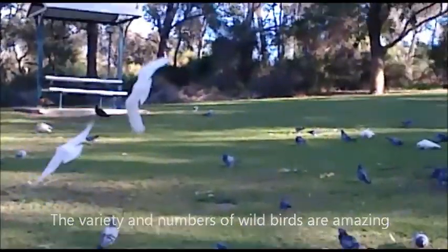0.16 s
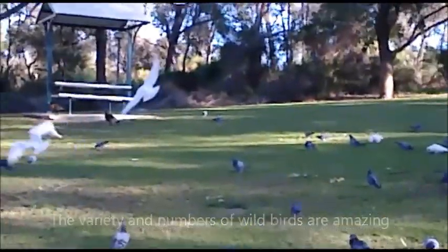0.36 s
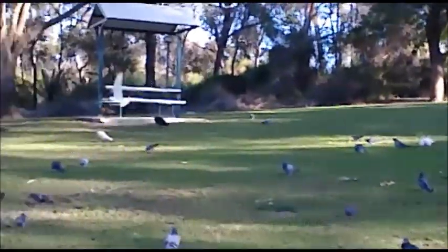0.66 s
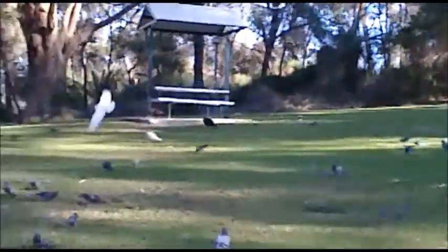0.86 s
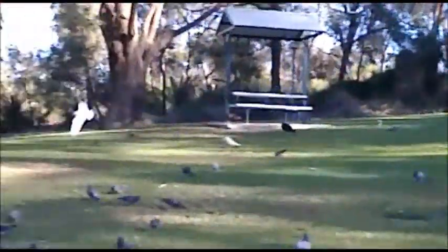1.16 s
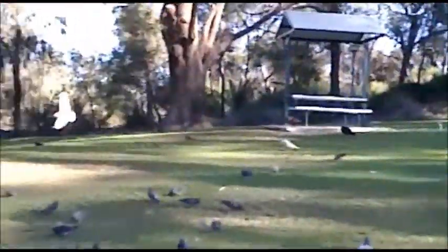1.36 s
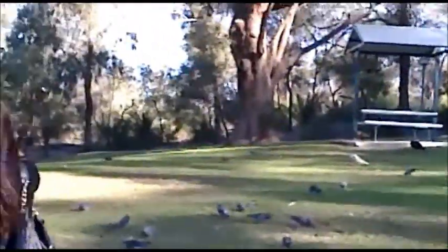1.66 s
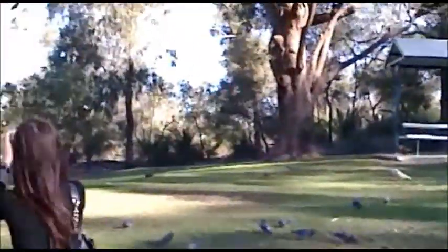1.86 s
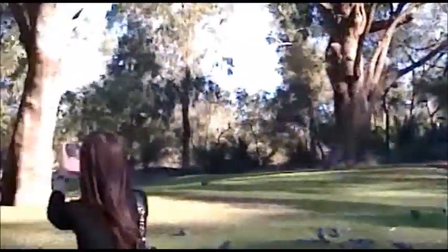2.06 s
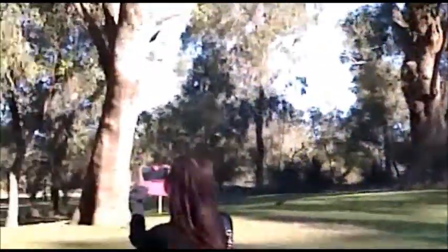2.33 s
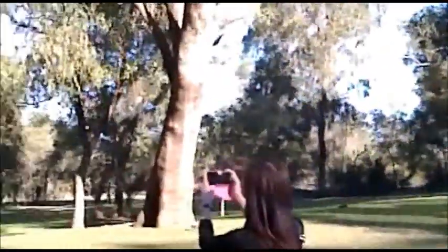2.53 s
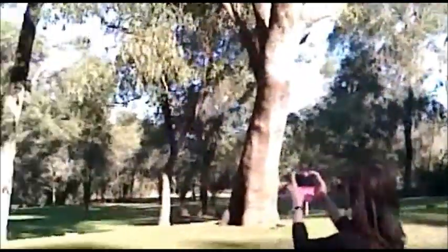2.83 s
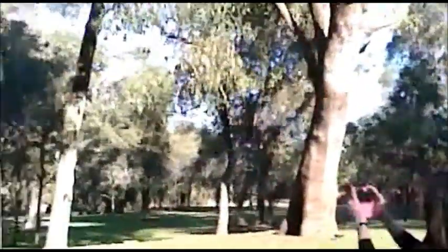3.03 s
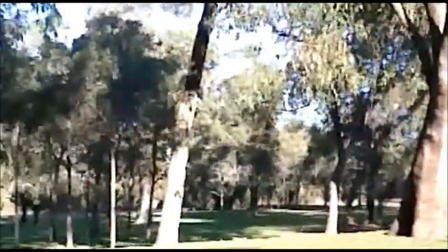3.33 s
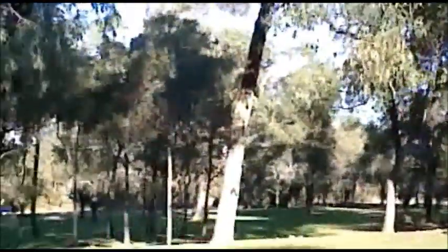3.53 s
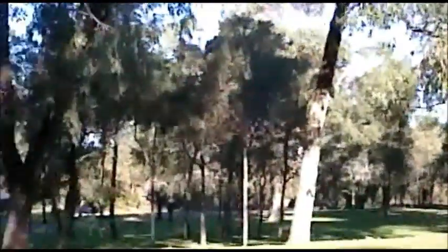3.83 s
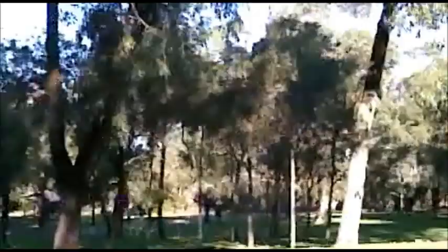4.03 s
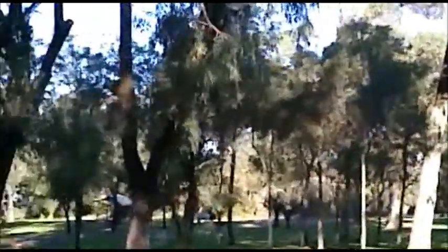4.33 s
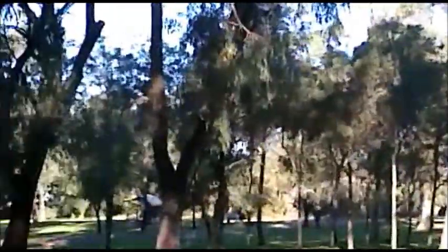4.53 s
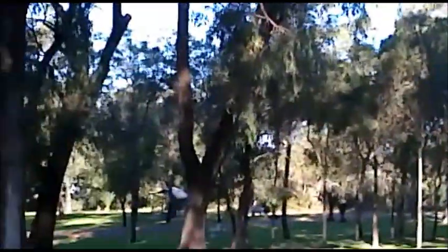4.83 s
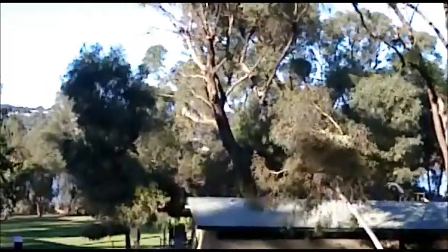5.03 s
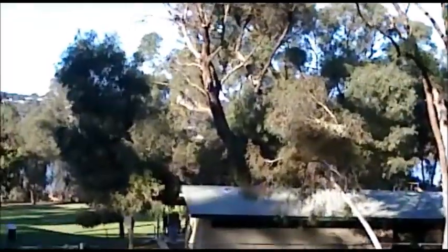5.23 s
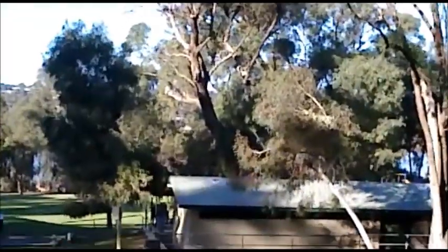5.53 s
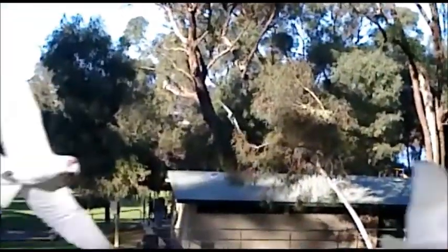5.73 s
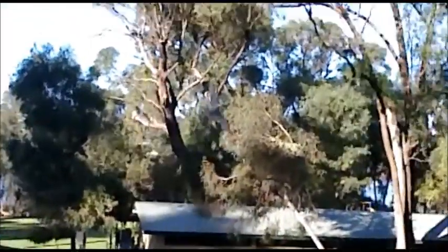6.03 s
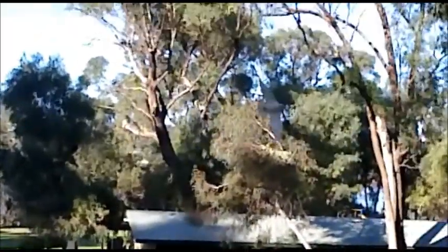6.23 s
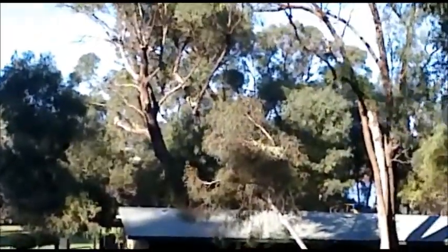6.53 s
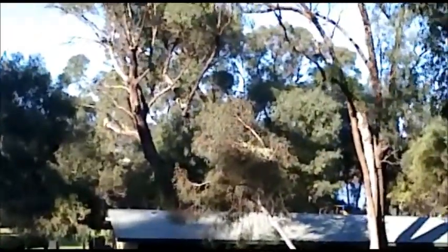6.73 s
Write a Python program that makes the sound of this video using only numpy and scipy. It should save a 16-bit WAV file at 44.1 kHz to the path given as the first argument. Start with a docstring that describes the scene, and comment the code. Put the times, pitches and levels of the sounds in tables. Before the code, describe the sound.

Many brief, raspy parrot squawks with a thin tree echo, faint pigeon coos and buffeting wind rumble, interrupted by one tiny dropout.

```python
"""Cockatoos squawk and screech over a park lawn. A buzzing, rattling voice warbles over two crests of pitch,
often with a short catch after them, and breaks up towards its end; two long screeches cross each other, and the
loudest plunges and climbs back. Far screeches are bands of noise, pigeons coo in husky near-sines, and the trees
return a thin echo of the cockatoos. Noise and pressure pulses make wind rumble and thump on the microphone, over a
park hush, a faint whine and a brief hiss. The sound cuts out briefly near five seconds."""
import sys
import numpy as np
from scipy import signal
from scipy.fft import rfft, irfft, next_fast_len
from scipy.io import wavfile
from scipy.ndimage import uniform_filter1d, map_coordinates

SR = 44100
rng = np.random.default_rng(int(sys.argv[2]) if len(sys.argv) > 2 else 0)


def transcribe(signal):
    """Save signal, clipped to [-1, 1], as a 16-bit WAV file at the path in sys.argv[1]."""
    frames = np.atleast_2d(signal).T
    limited = np.clip(frames, -1, 1)
    pcm = np.round(limited * 32767).astype(np.int16)
    wavfile.write(sys.argv[1], SR, pcm)


N = 303849
TURN = 2 * np.pi  # one cycle in radians


def undb(db):
    """Decibels to gain."""
    return 10 ** (np.asarray(db) / 20)


def unit(x):
    """Scale to rms 1."""
    return x / np.sqrt(np.mean(x ** 2) + 1e-18)


def times(start_s, end_s):
    """Sample times of a stretch, in seconds."""
    return np.arange(int(start_s * SR), int(end_s * SR)) / SR


def add(out, start_s, x):
    """Mix x into out from a given time."""
    i = max(int(start_s * SR), 0)
    out[i:i + len(x)] += x[:max(len(out) - i, 0)]


def shape(x, gain):
    """Filter x by a gain that is a function of frequency."""
    size = next_fast_len(len(x) + 2048)
    # 1 Hz is added so that no frequency is zero
    hz = np.arange(size // 2 + 1) * SR / size + 1
    return irfft(rfft(x, size) * gain(hz), size)[:len(x)]


def colour(points):
    """Gain function through (Hz, dB) points, interpolated along log frequency."""
    hz, db = np.transpose(points)
    return lambda f: undb(np.interp(np.log(f), np.log(hz), db))


def resonance(f, hz, width_hz):
    """A steep-sided resonance, gain 1 at its centre."""
    return 1 / (1 + ((f * f - hz * hz) / (f * width_hz * np.sqrt(2))) ** 2)


def noise(size, gain):
    """Coloured noise of rms 1."""
    return unit(shape(rng.standard_normal(size), gain))


def wobble(size, hz):
    """Random motion of rms 1, mostly slower than a given rate."""
    return noise(size, lambda f: 1 / (1 + (f / hz) ** 4))


def park_hush(level_db=-60.5):
    """The open park's steady hush is noise that thins towards the treble."""
    # spectrum of the hush: frequency_hz, relative_db
    hush_colour = [(120, -58), (400, -65), (4000, -80), (8000, -80.5), (14000, -92.5)]
    return noise(N, colour(hush_colour)) * undb(level_db)


def wind(trim_db=-2, gust_db=3.3, flurry_db=-10, flurry_s=0.022):
    """Eddies rumble on the microphone; the sharpest are a push of pressure inside a flurry."""
    # course of the wind: time_s, level_db (before the trim and the gusts)
    wind_course = [(0, -27.5), (.66, -21.5), (.8, -39.5), (1.58, -38.5), (1.72, -48), (1.85, -35),
                   (2.9, -26.5), (3.4, -32), (3.75, -23.5), (4.149, -40), (4.879, -29.5), (5.3, -51),
                   (6.05, -40.5), (6.55, -48.5), (6.75, -32), (6.89, -53.5)]
    # spectrum of the rumble: frequency_hz, relative_db
    wind_colour = [(15, -2), (35, 6), (80, 1), (250, -22), (3000, -79.5)]
    # sharp buffets: time_s, push_peak_db, push_length_s
    buffets = [(0.599, -8.5, 0.0026), (0.65, -12, 0.0015), (2.057, -5, 0.0041), (2.139, -9.5, 0.0017),
               (2.861, -4, 0.0026), (3.033, -15.5, 0.0016)]
    s, db = np.transpose(wind_course)
    level_db = np.interp(np.arange(N) / SR, s, db) + trim_db
    gusts_db = gust_db * wobble(N, hz=13.8)
    out = noise(N, colour(wind_colour)) * undb(level_db + gusts_db)

    t = times(-.1, .1)
    for at, peak_db, length in buffets:
        u = t / length
        # pressure rises at the centre and dips on either side
        push = (1 - u ** 2) / (1 + u ** 2) ** 2
        flurry = undb(flurry_db) * noise(len(t), colour(wind_colour))
        envelope = np.exp(-(t / flurry_s) ** 2)
        add(out, at + t[0], undb(peak_db) * (push + flurry) * envelope)
    return out


def whine(first_hz=397, last_hz=426, level_db=-75):
    """A faint, thin whine of a few high harmonics creeps up in pitch in the lull between calls."""
    out, t = np.zeros(N), times(1.9, 2.92)
    # the fundamental itself is absent
    phase = TURN * np.cumsum(np.linspace(first_hz, last_hz, len(t))) / SR
    tone = sum(np.sin(k * phase) / np.sqrt(k) * wobble(len(t), hz=3) for k in (5, 6, 10, 14))
    add(out, t.min(), unit(tone) * signal.windows.tukey(len(t)) * undb(level_db))
    return out


def hiss(start_s=5.1, end_s=5.29, level_db=-52):
    """A thin, bright hiss of noise swells and stops."""
    out, t = np.zeros(N), times(start_s, end_s)
    air = noise(len(t), lambda f: resonance(f, hz=11000, width_hz=10000))
    swell = np.linspace(0, 1, len(t)) ** 2 * signal.windows.tukey(len(t), .2)
    add(out, start_s, air * swell * undb(level_db))
    return out


def far_screech(start_s, end_s, hz, width_hz, level_db):
    """A distant screech, smeared by the trees into a rough band."""
    out, t = np.zeros(N), times(start_s, end_s)
    band = noise(len(t), lambda f: resonance(f, hz, width_hz) ** 2)
    add(out, start_s, band * signal.windows.tukey(len(t), .3) * undb(level_db))
    return out


def far_cockatoos():
    """All the distant screeches."""
    # start_s, end_s, centre_hz, width_hz (of the resonance before squaring), level_db
    far_calls = [(0, 0.21, 3560, 660, -50), (0.273, 0.321, 2060, 590, -48), (4.297, 4.865, 1570, 1380, -53)]
    return sum(far_screech(*row) for row in far_calls)


def coo_tone(hz, overtone_db):
    """A pigeon's voice: nearly a sine, muffled by its swollen crop."""
    phase = TURN * np.cumsum(hz) / SR
    return unit(np.sin(phase) + undb(overtone_db) * np.sin(2 * phase))


def pigeons(throb_hz=20.38, pitch_hz=350, lift_hz=35, last_hz=308, pause_s=0.1, moan_s=0.152, moan_db=-6.0):
    """Each coo is a swelling run of husky throbs, then a smooth falling moan."""
    # throbbing first half of each coo: start_s, end_s, level_db (before throb and swell)
    coos = [(1.043, 1.304, -42), (2.332, 2.565, -37), (3.437, 3.719, -37), (4.59, 4.811, -34.5)]
    out = np.zeros(N)
    for start, end, db in coos:
        t = times(start, end) - start
        throb = np.maximum(np.sin(TURN * throb_hz * t), 0)
        swell = undb(-7 * (2 * t / t[-1] - 1) ** 2) * signal.windows.tukey(len(t), .1)
        husk = noise(len(t), lambda f: resonance(f, hz=367, width_hz=122))
        # pitch lifts with every throb
        tone = coo_tone(pitch_hz + lift_hz * throb, overtone_db=-18.0)
        add(out, start, (tone + husk) * throb ** 2 * swell * undb(db))

        size = len(times(0, moan_s))
        hz = last_hz + (pitch_hz - last_hz) * np.linspace(1, 0, size) ** 2
        moan = coo_tone(hz, overtone_db=-14.5) * signal.windows.hann(size)
        add(out, end + pause_s, moan * undb(db + moan_db))
    return out


def trees(x, t60_s=0.38, wet_db=-22, build_up_s=0.007):
    """Trunks and crowns scatter a dull echo that builds up, then dies away."""
    t = times(0, 2)
    tail = noise(len(t), lambda f: resonance(f, hz=1530, width_hz=2850))
    tail = tail * undb(-60 * t / t60_s) * np.minimum(t / build_up_s, 1)
    return undb(wet_db) * signal.fftconvolve(x, tail / np.linalg.norm(tail))[:N]


def warble(start, beat, catch, first_hz, second_hz, dip, first_db, second_db, rough):
    """Turning points (s, pitch Hz, level dB, roughness) of a squawk: scoop, crest, dip, crest, perhaps a catch, fall."""
    # scoop into the first crest and fall from the last point: s, share of that point's pitch, dB against it
    attack_s, attack_pitch, attack_db = .019, .89, -14.5
    release_s, release_pitch, release_db = 0.016, 0.77, -19
    # the catch sinks and rebounds: shares of the second crest's pitch, dB of the rebound against it
    catch_dip, catch_pitch, catch_db = .8, .91, -3.5
    effort_db_per_octave = 20  # the voice weakens as its pitch dips
    # a squawk starts clean and ends broken
    clean, broken = rough * .45, rough * 2.1

    low_hz = min(first_hz, second_hz) * (1 - dip)
    # pitch falls and climbs at the same speed, so the dip lies nearer the lower crest
    share = (first_hz - low_hz) / (first_hz + second_hz - 2 * low_hz)
    low_db = first_db + share * (second_db - first_db) + effort_db_per_octave * np.log2(1 - dip)
    second = start + beat
    points = [(start - attack_s, first_hz * attack_pitch, first_db + attack_db, clean),
              (start, first_hz, first_db, clean),
              (start + share * beat, low_hz, low_db, rough),
              (second, second_hz, second_db, rough)]
    if catch > 0:
        sunk_db = second_db + effort_db_per_octave * np.log2(catch_dip)
        points += [(second + catch / 2, second_hz * catch_dip, sunk_db, broken),
                   (second + catch, second_hz * catch_pitch, second_db + catch_db, broken)]
    last, last_hz, last_db, _ = points[-1]
    return points + [(last + release_s, last_hz * release_pitch, last_db + release_db, broken)]


def squawk(throat_hz, beak_hz, beak_db, upper_db, rows):
    """The syrinx buzzes, rattles and rasps; throat and beak colour it and move a little with the pitch."""
    # what the throat lets through between its resonances: frequency_hz, gain_db (before the beak's muffling)
    throat_floor = [(550, -11.5), (950, -19), (2200, -7), (2900, -18.5), (4300, -23), (6400, -20),
                    (10500, -51.5)]
    follow = 0.13  # octaves that the resonances move for each octave of pitch
    rattle_cycles = 3
    rattle_depth = .6  # radians, for the fundamental at full roughness
    rasp_db = -6  # rasping air against the buzz at full roughness
    fade_s = .005

    s, pitch, db, rough = np.transpose(rows)
    s = np.sort(s)
    t = times(s[0] - fade_s, s[-1] + fade_s)
    size = len(t)
    # pitch swings in rounded arches through its turning points
    place = np.interp(t, s, np.arange(len(s)))
    hz = map_coordinates(pitch, [place], order=3, mode="nearest")
    chaos = np.clip(np.interp(t, s, rough) * undb(2 * wobble(size, hz=25)), 0, 1)

    def tract(f):
        """Throat and beak resonances; a half-shut beak muffles the sound, more towards the treble."""
        upper = undb(upper_db) * resonance(f, hz=4926, width_hz=450)
        beak = resonance(f, beak_hz, width_hz=410) + upper
        throat = colour(throat_floor)(f) + resonance(f, throat_hz, width_hz=363)
        muffle = (1 + (f / throat_hz) ** 2) ** (min(beak_db, 0) / 45)
        return (throat + undb(beak_db) * beak) * muffle

    jitter = 0.023 * chaos * wobble(size, hz=355)
    phase = TURN * np.cumsum(hz * (1 + jitter)) / SR
    shift = (hz / hz.mean()) ** follow
    # a strained syrinx repeats only every few cycles: side bands beside the harmonics, the high ones most
    rattle = phase / rattle_cycles
    buzz = np.zeros(size)
    for k in range(1, 19):
        split = rattle_depth * chaos * np.sqrt(k) * np.sin(rattle + TURN * rng.random())
        harmonic = np.cos(k * phase + split + TURN * rng.random())
        # as the bird turns in flight, each harmonic swells and fades by itself
        buzz += tract(k * hz / shift) * harmonic * undb(4.3 * wobble(size, hz=27))
    # the air pulses once a cycle
    rasp = shape(rng.standard_normal(size) * (1 + np.cos(phase)), tract)
    voice = unit(buzz) + undb(rasp_db) * chaos * unit(rasp)
    # even out the loudness, so that the level curve alone sets it
    voice = voice / np.sqrt(uniform_filter1d(voice ** 2, size=700) + 1e-12)
    edges = signal.windows.tukey(size, 2 * fade_s * SR / size)
    out = np.zeros(N)
    add(out, t[0], voice * edges * undb(np.interp(t, s, db)))
    return out


def cockatoos():
    """All the near calls: short squawks on a warbling gesture, and screeches on free curves."""
    # one squawk each: first_crest_s, time_to_second_crest_s, time_on_to_catch_s (0 for none), first_pitch_hz,
    # second_pitch_hz, dip_below_lower_crest (share), first_level_db, second_level_db, throat_resonance_hz,
    # beak_resonance_hz, beak_db, upper_resonance_db (against the beak), roughness (share, mid-squawk)
    squawks = [ (0.127, 0.046, 0.045, 596, 595, 0.06, -43, -44.5, 1070, 3250, -3.5, -6, 0.4),
               (0.242, 0.025, 0.0028, 616.6, 507, 0, -24, -36, 1120, 3570, -21, 8.5, 0.1),
               (0.792, 0.049, 0.013, 824, 887, 0.05, -33.5, -34.5, 1990, 3590, -5.5, -7, 0.6),
               (1.258, 0.052, 0.019, 674, 679, 0.12, -32.5, -34, 3200, 3540, -19, -14, 0.4),
               (1.346, 0.046, 0.043, 869, 1030, .12, -36, -32, 1830, 3420, -6, -4, 0.29),
               (1.592, 0.06, 0.026, 762, 817, 0.16, -38.5, -34, 5300, 3640, 0.5, -1, 0.17),
               (1.812, 0.041, 0.057, 646, 705, 0.06, -30, -30.5, 3270, 4040, -6.5, 6, 0.15),
               (2.946, 0.054, 0, 785, 813, 0.03, -41, -40, 1430, 3900, -8.5, -13, 0.18),
               (3.002, 0.056, 0.068, 662, 739, 0.07, -43, -31, 1420, 3470, -2, -13, 0.2),
               (3.138, 0.037, 0, 668, 474, 0.1, -41.5, -44.5, 1500, 2050, -14, -10, 0.24),
               (3.244, 0.022, 0.051, 638, 690, 0, -42.5, -42.5, 1230, 3320, -31, -20, 0.3),
               (3.539, 0.048, 0.0045, 811, 865, 0.08, -40, -34, 1580, 3570, -5.5, -14.5, 0.15),
               (3.972, 0.04, 0, 616, 643, 0.1, -39.5, -38, 1230, 3340, -9, -8, 0.21),
               (4.026, 0.038, 0, 635, 500, 0.05, -35, -53.5, 1830, 3330, -43, -11, 0.1),
               (4.229, 0.063, 0.036, 781.5, 860, 0.09, -43, -29.5, 1650, 3690, -1, -14, 0.28),
               (4.362, 0.024, 0.027, 739, 680, 0.03, -45.5, -48, 1400, 3740, -0.5, -14.5, 0.6),
               (4.672, 0.097, 0.0083, 658, 648, .12, -43.5, -41.5, 1900, 3450, -0.5, -5, 0.9),
               (5.168, 0.066, 0.033, 806, 868, 0.2, -45, -34.5, 1570, 3660, -5, -16, 0.1),
               (5.368, 0.051, 0.0012, 705, 578, 0.16, -29.5, -30, 1110, 3720, -2.5, -20, 0.4),
               (5.904, 0.056, 0.046, 628, 705.5, 0.02, -37, -32.5, 1300, 3260, -4, -6, 0.24),
               (6.158, 0.061, 0.039, 803, 868, 0.19, -40.5, -36, 1610, 3560, -17.5, 0, 0.26),
               (6.321, 0.049, 0.032, 631, 531, 0.14, -50.5, -51, 1190, 3380, -10.5, -5, 0.56),
               (6.515, 0.064, 0, 681, 703, 0.16, -52, -58.5, 1100, 3600, -3, -18, 0.2), ]
    # a climb that cracks and holds, a second bird sagging across it, the loudest plunge and climb, a hard rasp:
    # throat_resonance_hz, beak_resonance_hz, beak_db, upper_resonance_db (against the beak),
    # curve of (time_s, pitch_hz, level_db, roughness as a share)
    screeches = [ (2540, 2970, -6.5, -6.5, [(.855, 712.5, -50, .12), (.897, 720, -31.5, 0.22),
                 (.96, 766.6, -30, 0.28), (.986, 814.4, -23, 0.07), (1.012, 704, -33, 0.63),
                 (1.055, 756, -30, .25), (1.085, 701.5, -33.5, 0.28), (1.15, 692, -32.5, 0.2),
                 (1.18, 683, -39, 0.5)]), (2020, 3050, -2, -4.5, [(.99, 720, -33.5, .6),
                 (1.067, 640, -37, 0.3), (1.115, 655.4, -29.5, 0.22), (1.225, 632.6, -37, 0.23),
                 (1.28, 563, -43, 0.6)]), (2900, 3730, 0.5, -1, [(4.528, 816, -46, .1),
                 (4.546, 947, -25, 0.3), (4.58, 776, -25.5, 0.02), (4.595, 639, -35.5, 0.88),
                 (4.615, 900, -28, 0.25), (4.631, 939, -29.5, 0.2), (4.644, 750, -37.5, 0.4)]),
                 (2020, 3800, -7.5, -22.5, [(4.855, 667.5, -35.5, .9), (4.885, 621, -44, 1.1)]), ]
    out = np.zeros(N)
    for *gesture, throat_hz, beak_hz, beak_db, upper_db, rough in squawks:
        out += squawk(throat_hz, beak_hz, beak_db, upper_db, warble(*gesture, rough))
    for row in screeches:
        out += squawk(*row)
    return out


def scene():
    """Near and far cockatoos with their echo, pigeons and wind over the hush of the park."""
    background = park_hush() + wind() + whine() + hiss()
    birds = far_cockatoos() + cockatoos()
    return (background + pigeons() + trees(birds) + birds)[None]


def record(dry):
    """The sound drops out once, and the top is cut by a steep low-pass."""
    # the dropout: start_s, end_s
    silence = (4.888, 5.05)
    top_hz = 15700
    t = np.arange(N) / SR
    sounding = (t < silence[0]) | (t > silence[1])
    gate = uniform_filter1d(1. * sounding, size=64)
    low_pass = signal.ellip(8, .2, 70, top_hz, fs=SR, output="sos")
    return signal.sosfilt(low_pass, dry * gate)


dry = scene()
out = record(dry)
transcribe(out)
```